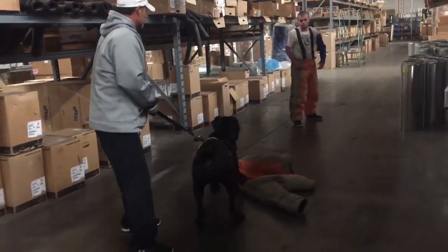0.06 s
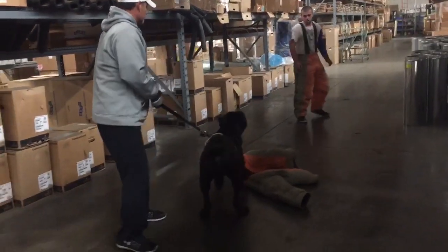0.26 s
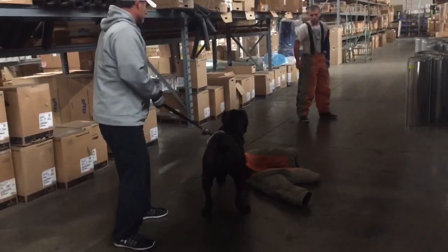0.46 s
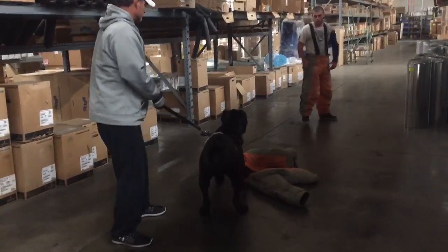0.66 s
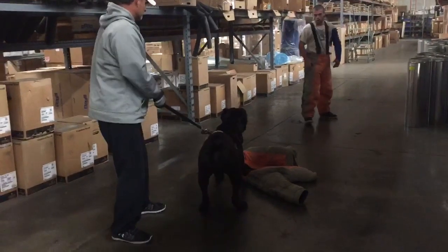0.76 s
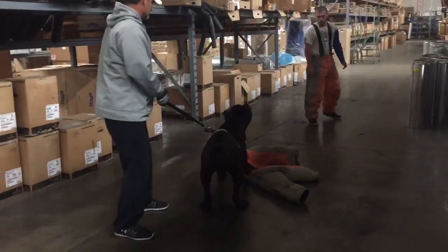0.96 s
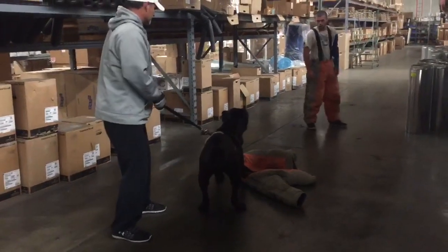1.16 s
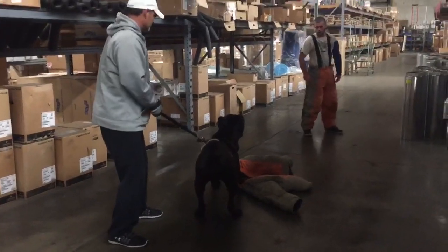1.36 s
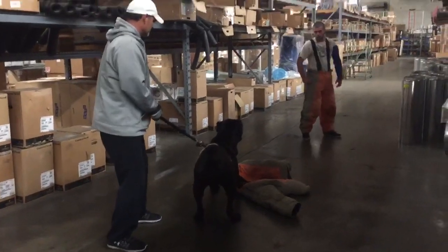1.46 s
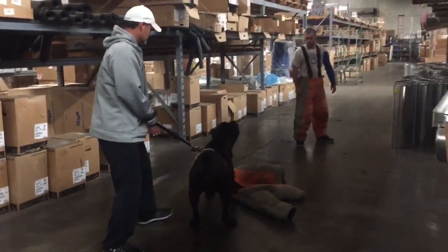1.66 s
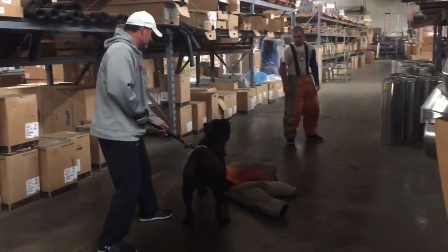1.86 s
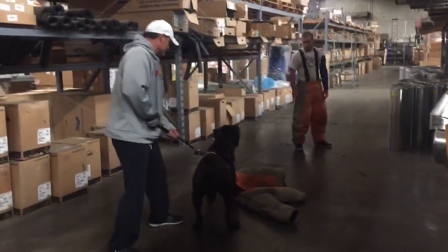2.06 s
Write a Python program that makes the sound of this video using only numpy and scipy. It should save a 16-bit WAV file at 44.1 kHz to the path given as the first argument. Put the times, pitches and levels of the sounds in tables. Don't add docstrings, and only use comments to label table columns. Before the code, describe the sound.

Three loud, hoarse barks from a big dog ring around a large concrete hall over faint hum

```python
import sys
import numpy as np
from scipy import signal
from scipy.io import wavfile
from scipy.ndimage import uniform_filter1d

SR = 44100
rng = np.random.default_rng(int(sys.argv[2]) if len(sys.argv) > 2 else 0)


def waveform_to_disk(signal):
    frames = np.transpose(np.atleast_2d(signal))
    scaled = np.clip(frames, -1, 1) * 32767
    samples = np.round(scaled).astype(np.int16)
    wavfile.write(sys.argv[1], SR, samples)


def gain_from_db(level_db):
    decades = np.asarray(level_db, float) / 20
    return 10 ** decades


N = 92610
LEAD_S = .7


def evened(x):
    return x / np.sqrt(np.mean(x ** 2) + 1e-20)


def noise(length):
    return rng.standard_normal(N // 4)[:length]


def wander(length, size):
    drift = uniform_filter1d(rng.standard_normal(N // 4), size)
    return evened(uniform_filter1d(drift, size))[:length]


def resonate(x, hz, width):
    turn = np.exp(2j * np.pi * np.cumsum(hz * np.ones(len(x))) / SR)
    r = np.exp(-np.pi * width / SR)
    return 2 * (turn * signal.lfilter([(1 - r) ** 2], [1, -2 * r, r * r], x / turn)).real


def read(points, hz):
    f, value = np.transpose(points)
    return np.interp(np.log(hz + 1), np.log(f + 1), value)


def follow(rows):
    s, *columns = np.transpose(rows)
    t = np.arange(s[0], s[-1], 1 / SR)
    return s[0], [np.interp(t, s, c) for c in columns]


def add(mix, s, sound):
    part = mix[round((s + LEAD_S) * SR):][:len(sound)]
    part += sound[:len(part)]


# (t/s, pitch f/Hz, effort level/dB, mouth opening/0-1)
BARKS = [
    [(.184, 250, -45, .7), (.2, 290, -24, .8), (.22, 345, -14, 1.), (.245, 355, -12, .9),
     (.262, 435, -18, .3), (.3, 445, -17, .25), (.33, 425, -19, .15), (.358, 345, -20, .0),
     (.41, 180, -44, .0)],
    [(.9, 220, -48, .7), (.915, 290, -22, .8), (.93, 342, -13, 1.), (.955, 355, -11, .9),
     (.98, 420, -21, .3), (1.02, 400, -21, .2), (1.058, 385, -17, .2), (1.08, 305, -28, .0),
     (1.135, 180, -43, .0)],
    [(1.615, 240, -46, .7), (1.63, 290, -22, .8), (1.65, 330, -14, 1.), (1.665, 355, -12, .9),
     (1.69, 420, -21, .3), (1.74, 425, -21, .2), (1.775, 385, -18, .2), (1.797, 310, -28, .0),
     (1.85, 185, -43, .0)],
]
ROUGH = (.17, .25, .32)
THROB = (0.061, 0.68, 0.48)


def bark(rows, steady, throb, whistle_row):
    start, (hz, effort_db, mouth) = follow(rows)
    t = np.arange(len(hz)) / SR
    rough = steady + .41 * np.exp(-t / .033)
    turns = np.cumsum(hz * (1 + .1116 * rough * wander(len(t), size=120))) / SR
    gate = .13 + np.exp(-(turns % 1) / .53)
    puffs = evened(gate * noise(len(t)))
    build = np.sin(np.pi / 2 * np.minimum(t / .041, 1)) ** 2

    voice = build * chest(turns, mouth, throb) + throat(folds(turns, puffs, rough), mouth)
    voice = voice / np.sqrt(uniform_filter1d(voice ** 2, size=2200) + 1e-9)
    voice += whistle(t, *whistle_row) + crack(t, puffs)
    air_db = effort_db.max() - 6.5 - 74.5 * t
    whole = gain_from_db(effort_db) * voice + build ** 2 * gain_from_db(air_db) * air(gate, mouth)

    ends = np.clip(np.minimum(t / .002, (t[-1] - t) / .04), 0, 1)
    return start, ends * signal.sosfilt(signal.butter(3, 140, "high", fs=SR, output="sos"), whole)


def folds(turns, puffs, rough):
    harmonics = sum(np.cos(2 * np.pi * k * turns) for k in range(2, 14))
    return (1 - rough) * harmonics + rough * gain_from_db(2.5) * 7 * puffs


def chest(turns, mouth, throb):
    t = np.arange(len(turns)) / SR
    beat = 1 + throb * np.sin(2 * np.pi * 33.72 * (t + .0033 * wander(len(t), size=900)))
    return gain_from_db(np.interp(mouth, (0, 1), (2.5, -9.5))) * beat * np.cos(2 * np.pi * turns)


# (f/Hz, width f/Hz, level shut/dB, level open/dB)
THROAT = [(488, 120, -25.5, -7.5), (945, 197, 1, -4.5), (1118, 63, -11.5, -1), (1269, 355, -10, 0.5),
          (1775, 276, -9, -9), (1948, 53, -38, -4.5), (2374, 660, -27.5, -43)]


def throat(drive, mouth):
    jaw_hz = np.interp(mouth, (0, 1), (640, 700))
    voice = gain_from_db(np.interp(mouth, (0, 1), (2.5, 6))) * resonate(drive, jaw_hz, width=150)
    for k, (f, width, shut_db, open_db) in enumerate(THROAT):
        level_db = shut_db + (open_db - shut_db) * mouth
        voice -= (-1) ** k * gain_from_db(level_db) * resonate(drive, f, width)
    return voice


# (middle t/s after the start, half length t/s, level/dB)
WHISTLES = [(.056, .016, -4), (.058, .022, -1), (.047, .013, -5)]


def whistle(t, middle, half, level_db):
    tone = np.cos(2 * np.pi * np.cumsum(1792 * (1 + .006 * wander(len(t), size=300))) / SR)
    return gain_from_db(level_db) * np.exp(-((t - middle) / half) ** 4) * tone


def crack(t, puffs):
    return gain_from_db(-12.5) * np.exp(-(t / .036) ** 2) * evened(resonate(puffs, 1986, width=138))


# (f/Hz, width f/Hz, level shut/dB, level open/dB)
AIR = [(2990, 1700, -28.5, -18), (4240, 690, -27, -25), (5400, 3000, -25, -37), (6160, 730, -30, -38),
       (8600, 1600, -43, -40.5), (13000, 4100, -49, -48.5)]


def air(gate, mouth):
    total = np.zeros(len(gate))
    for f, width, shut_db, open_db in AIR:
        hiss = evened(resonate(gate * noise(len(gate)), f, width))
        total += gain_from_db(shut_db + (open_db - shut_db) * mouth) * hiss
    return total


# (delay t/s, level/dB)
SLAPS = [(0.013, -17.5), (0.029, -13), (0.108, -15.5), (0.202, -33)]


def wall_slaps(x):
    slaps = np.zeros(SR // 2)
    for delay, db in SLAPS:
        slaps[round(delay * SR) + np.array([0, 61, 173])] += gain_from_db(db) * np.array([.8, -.45, .35])
    slaps = signal.lfilter(*signal.butter(1, (330, 3500), "band", fs=SR), slaps)
    return signal.fftconvolve(x, slaps)[:len(x)]


def hall(x):
    turn = np.pi * 5 * np.arange(len(x)) / SR
    wet = wall_slaps(x)
    for k in range(3):
        facing = np.cos(turn + k * np.pi / 3) * np.sqrt(2 / 3)
        wet += signal.fftconvolve(x * facing, tail())[:len(x)]
    return wet


# (f/Hz, t60 t/s)
HALL = [(150, 0.79), (300, 0.76), (430, 1.18), (700, 1.175), (1000, 1.25), (1800, 1.45), (2400, 0.68),
        (4000, 0.91), (9000, 0.7), (15000, 1.05)]
# (f/Hz, level/dB)
HALL_TONE = [(150, -15.5), (310, -5.5), (430, 5.5), (690, -6.5), (900, -2), (1900, -6), (2400, 5),
             (15000, -1.5)]


def tail():
    taps = np.zeros(2 * SR)
    at = np.arange(400, 2 * SR - 20, 20)
    taps[at + rng.integers(0, 20, len(at))] = rng.choice([-1., 1.], len(at))
    hz, t, z = signal.stft(taps, SR, nperseg=1024)
    decay_db = -60 * t / np.maximum(read(HALL, hz), .1)[:, None]
    z = z * gain_from_db(decay_db + read(HALL_TONE, hz)[:, None])
    swell = 1 - np.exp(-np.arange(2 * SR) / SR / .0081)
    out = signal.istft(z, SR, nperseg=1024)[1][:2 * SR] * swell
    return gain_from_db(-10) * out / np.linalg.norm(out)


# (t/s, pitch f/Hz, level/dB)
SQUEAKS = [
    [(.694, 3150, -66), (.702, 3350, -54), (.72, 3650, -53), (.735, 3700, -62), (.76, 3650, -68),
     (.79, 3600, -80)],
    [(1.48, 3850, -88), (1.55, 3800, -78), (1.61, 3750, -78), (1.63, 3700, -88)],
]


def squeak(rows):
    start, (hz, level_db) = follow(rows)
    turns = np.cumsum(hz * (1 + .04 * wander(len(hz), size=60))) / SR
    octave_db = -12 + .6 * (level_db - level_db.max())
    tone = np.sin(2 * np.pi * turns) + gain_from_db(octave_db) * np.sin(4 * np.pi * turns)
    return start, gain_from_db(level_db) * tone


# (start t/s, length t/s, level/dB, centre f/Hz, width f/Hz)
SCUFFS = [
    (0.402, 0.034, -68, 13000, 6400),
    (0.486, 0.19, -67, 4923, 12000),
    (.757, 0.037, -76.5, 11400, 8050),
    (1.239, 0.051, -72, 9400, 9000),
    (2.033, 0.031, -71, 7000, 10400),
    (0.171, 0.042, -65, 6070, 5000),
    (0.498, 0.15, -60.5, 2800, 2500),
]


def scuff(start, length, level_db, hz, width):
    t = np.arange(0, length, 1 / SR)
    grit = noise(len(t)) * gain_from_db(.83 * wander(len(t), size=150))
    return start, gain_from_db(level_db) * np.sin(np.pi * t / length) ** .4 * evened(resonate(grit, hz, width))


# (f/Hz, level/dB per Hz)
HUM = [(25, -31), (55, -8.5), (120, -4), (220, -13), (500, -10.5), (2000, -16), (5000, -49), (15500, -52)]


def hum():
    frames, hz = N // 512 + 5, np.fft.rfftfreq(2048, 1 / SR)
    a, b, patches = rng.standard_normal((frames, 1025, 3)).T
    patches = uniform_filter1d(patches, size=8, axis=0)
    patches = evened(uniform_filter1d(patches, size=6, axis=1))
    z = (a + 1j * b) * gain_from_db(read(HUM, hz)[:, None] + .89 * patches)
    return gain_from_db(-55) * evened(signal.istft(z, nperseg=2048, noverlap=1536)[1][:N])


def scene():
    dog, shoes = np.zeros((2, N + round(LEAD_S * SR)))
    for row in zip(BARKS, ROUGH, THROB, WHISTLES):
        add(dog, *bark(*row))
    start, sound = bark(BARKS[0], ROUGH[0], THROB[0], WHISTLES[0])
    add(dog, start - .72, gain_from_db(2.5) * sound)
    for rows in SQUEAKS:
        add(shoes, *squeak(rows))
    for row in SCUFFS:
        add(shoes, *scuff(*row))
    wet = hall(dog + gain_from_db(-4) * shoes)
    return ((dog + shoes + wet)[-N:] + hum())[None]


def band_limit(x):
    return signal.sosfilt(signal.butter(12, 15710, fs=SR, output="sos"), x)


def record(dry):
    duck_from_db, duck_share, recover_db_per_s = -27, .18, 49
    power_db = 10 * np.log10(abs(uniform_filter1d(dry[0] ** 2, size=800)) + 1e-12)
    fall = np.arange(N) * recover_db_per_s / SR
    held_db = np.maximum.accumulate(power_db + fall) - fall
    over_db = np.maximum(held_db - duck_from_db, 0)
    ducked = dry * gain_from_db(4 - duck_share * uniform_filter1d(over_db, size=1500))
    limit, lopsided = 1.1, .04
    bent = limit * np.tanh(ducked / limit) + lopsided * ducked ** 4
    mix = signal.lfilter([1, -1], [1, -.997], bent)
    return band_limit(mix)


dry = scene()
out = record(dry)
waveform_to_disk(out)
```